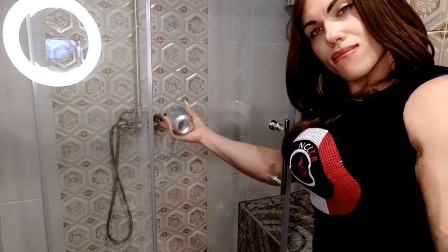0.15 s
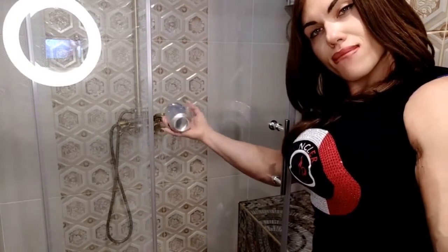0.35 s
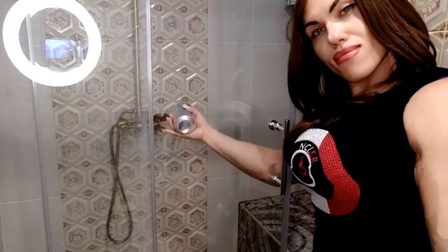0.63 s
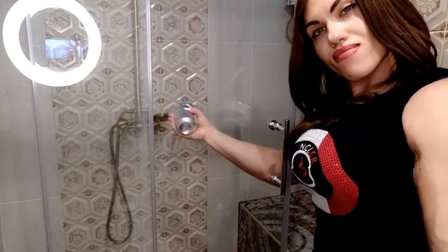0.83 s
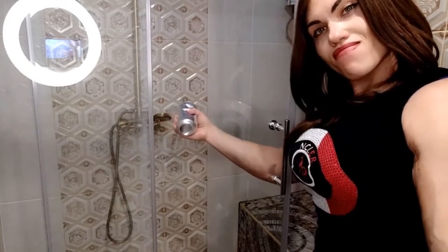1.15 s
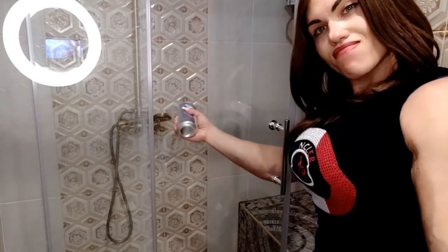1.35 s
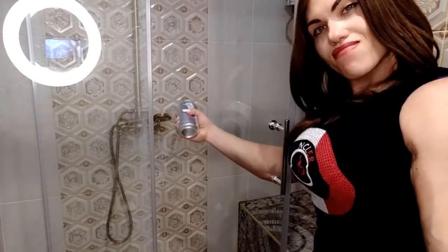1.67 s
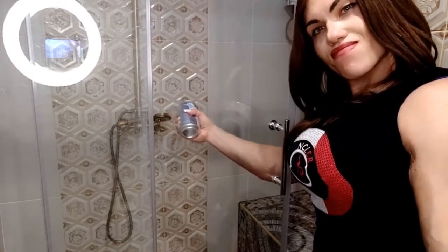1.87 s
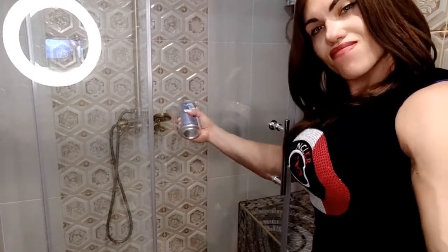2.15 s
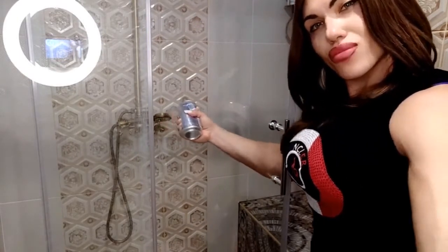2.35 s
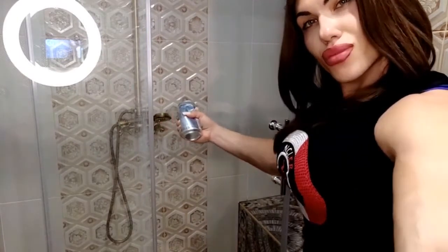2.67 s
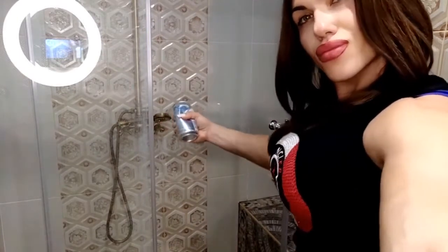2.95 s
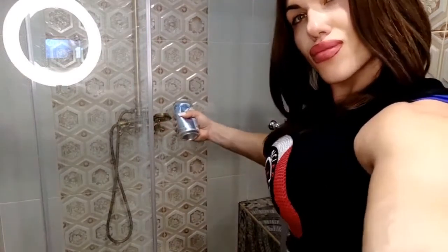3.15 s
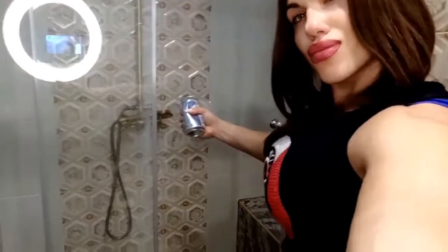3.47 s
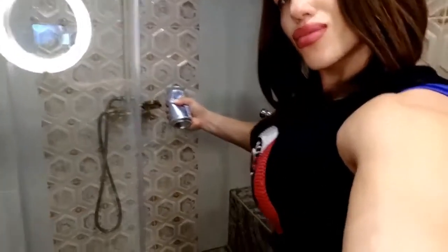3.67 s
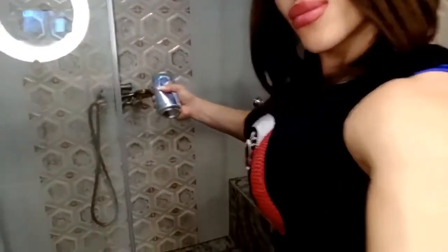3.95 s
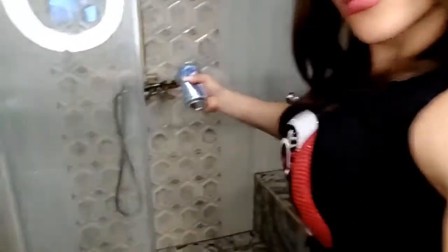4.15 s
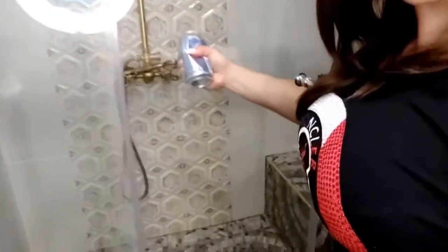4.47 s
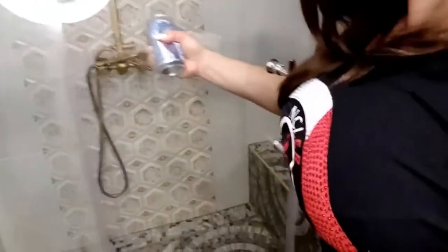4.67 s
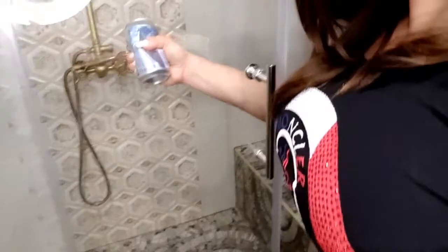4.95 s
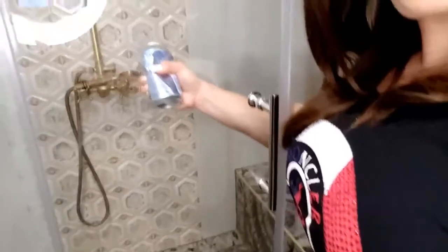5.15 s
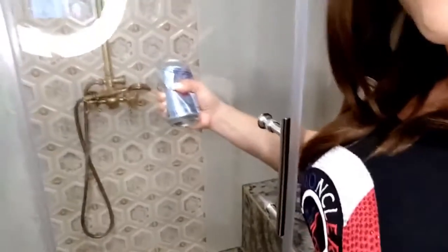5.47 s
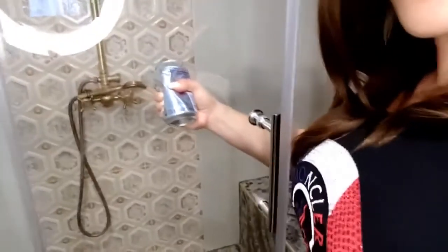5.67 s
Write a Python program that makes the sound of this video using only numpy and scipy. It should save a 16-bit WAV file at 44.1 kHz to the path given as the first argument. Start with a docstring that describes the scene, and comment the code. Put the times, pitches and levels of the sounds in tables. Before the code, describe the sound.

A thin metal can crunches in sharp bright bursts in a tiled bathroom, followed by quiet rubbing and later dull handling thuds close to the microphone.

```python
"""A tiled bathroom: a thin aluminium drink can is squeezed in one hand, its wall buckling in bursts of cracks.
Each buckle is a flurry of clicks ringing a panel; single creases crack more sharply among them.
The other hand slips on the phone, mostly later on: filtered click flurries thud in its case and scuff.
Fingers and clothes rub softly throughout, as grainy coloured noise, over rushing air and a ventilation hum.
Cracks, scuffs and finger hiss are brightest near 9 kHz, where the microphone port resonates."""
import sys
import numpy as np
from scipy import signal
from scipy.fft import rfft, irfft
from scipy.io import wavfile

SR = 44100
rng = np.random.default_rng(int(sys.argv[2]) if len(sys.argv) > 2 else 0)


def dump_mix(stems):
    """Bounce the given channels to the path in sys.argv[1] as a 16-bit WAV at rate SR."""
    frames = np.atleast_2d(stems).T  # one column per channel
    limited = np.clip(frames, -1, 1)  # hard clip at full scale
    pcm = np.round(limited * 32767).astype(np.int16)
    wavfile.write(sys.argv[1], SR, pcm)


N = 256662
TAPS = 8192   # filter length in samples
HZ = np.maximum(np.fft.rfftfreq(TAPS, 1 / SR), 1)
TIME = np.arange(N) / SR
RUN_UP_S = .02   # room ahead of each click flurry's peak
RUN_UP_PER_S = 12000   # fine clicks per second before the peak

# All event levels and spectra are relative.
# buckles of the can wall: t/s, snap level/dB, first fold level/dB, fold spacing/s, tilt/(dB per octave),
# low edge f/Hz, low panel note f/Hz, high panel note f/Hz
BUCKLES = [(.589, -11.5, -13, 0.015, -5, 500, 2370, 8500), (0.852, -21, -12.5, 0.015, -2, 500, 1000, 9250),
           (.911, 0, 2.5, 0.017, -0.9, 296, 790, 7140), (1.139, -3.5, -4.5, 0.0061, -3.5, 1200, 2500, 7350),
           (1.157, 12.5, 8.5, .019, 1.5, 1500, 2200, 9300), (1.194, 9.5, 5.5, .025, 0, 1400, 4250, 9200),
           (1.309, 17.5, 16.5, .014, 2.5, 220, 4800, 10040), (1.341, 12, 12, .025, 2.5, 220, 3300, 7400),
           (1.407, 0, -13, 0.012, 1.5, 1500, 2400, 9000), (1.521, 1.5, 2, 0.014, 8, 500, 3000, 8900)]
# colour of the cracking wall: f/Hz, level/dB
CAN_COLOUR = [(300, -25), (600, -22), (850, -16.5), (1300, -18), (2200, -12.5), (3500, -10.5),
              (4300, -13.5), (6500, -10), (8200, -6), (9100, -2), (10000, -10.5), (11000, -17),
              (14000, -23.5)]
# low, hollow notes of the yielding can: f/Hz, width/Hz, level/dB
HOLLOW_MODES = [(133, 14, -4), (172.4, 13, 7.5), (216.6, 1.9, 14.5), (309, 33, 2), (470, 113, 2)]
HOLLOW_DB = -35   # against the cracks
FOLD_LOSS_DB, FOLD_TILT_DB = 11, 0.8   # loss from fold to fold; tilt gained per fold, in dB per octave
FOLD_NOTE_RATIO = 0.99   # each fold rings lower than the last
SNAP_S, FOLD_SPREAD = 0.0026, 0.46   # length of the snap; share of its delay that a fold lasts longer
SNAP_HALF_DB = 3   # the sharp edge is half strength here, softer in weaker folds
PANEL_WIDTH_HZ, PANEL_DB = 150, -10   # the low note of a snapping panel

# single creases cracking out of the crumpling: t/s, level/dB, note f/Hz
CRACKS = [(.854, -16, 9500), (0.925, -6, 7500), (1.158, 6, 9000), (1.177, 7, 9200), (1.186, 4, 8000),
          (1.194, 4, 9000), (1.222, -7, 9000), (1.248, -5, 9100), (1.3, -10, 2600), (1.309, 0, 3350),
          (1.333, 8.5, 7800), (1.34, -5, 8400), (1.366, 11, 9200), (1.384, 1, 8800), (1.41, 0, 7540),
          (3.083, -10, 8800), (3.097, -15, 9000), (3.488, -15, 4300), (3.497, -6, 8800), (3.518, -10, 8600),
          (3.757, -15, 9150), (3.779, -5.5, 9000)]
CRACK_S, CRACK_WIDTH_HZ = 0.0014, 2000

# grip slips on the phone: t/s, thud level/dB, scuff level/dB, length/s, thud note f/Hz, scuff note f/Hz,
# scuff tilt/(dB per octave)
GRIP_SLIPS = [(0.52, -15, -17, 0.0096, 865, 4880, 1), (.535, -12, -24, 0.029, 345, 8850, -6),
              (.585, -13, -21, 0.031, 215, 8800, -3), (3.171, -9, -22, 0.0098, 653, 8850, 0),
              (3.335, -16.5, -29, 0.069, 370, 8600, -2), (3.453, -11.5, -26, 0.015, 268, 8850, 1),
              (3.472, -20, -1.5, 0.0091, 600, 8800, -2), (3.489, -9.5, 3.5, 0.01, 660, 8700, -2),
              (3.504, -9, -12, 0.0074, 302, 8700, -3), (3.571, -16.5, -5, 0.0052, 740, 7400, -4.5),
              (3.756, -25.5, -4, 0.0031, 590, 9100, 2), (3.783, -18, -5.5, 0.0091, 615, 9200, -1),
              (3.847, -22.5, -17, 0.01, 893, 9200, -5), (4.534, -13, -24, 0.087, 170, 8850, -6),
              (4.602, -12, -14, 0.0068, 600, 3500, -6), (4.61, 0, -6, 0.011, 670, 9350, -3.5),
              (4.632, -8.5, -18, 0.0063, 330, 3500, -6), (4.677, -2.5, -11, 0.016, 353, 4930, -7.5),
              (4.724, -5, -0.5, 0.0068, 560, 8840, -5.5), (4.736, -12.5, -5.5, 0.0091, 335, 4900, -4),
              (5.018, -8, -9.5, 0.017, 540, 8900, -6.5), (5.043, 6.5, 9.5, .0062, 494, 2930, -1),
              (5.06, 6, -3, 0.0079, 650, 4850, 0), (5.079, -4, 0.5, .005, 265, 2900, -1),
              (5.123, 5.5, 10.5, 0.0062, 506, 2814, -2.5), (5.132, 6.5, 13.5, 0.0085, 325, 8730, -1.5),
              (5.144, 3.5, 6, 0.006, 300, 2820, 3), (5.164, 4, 2.5, 0.0042, 1055, 2090, -1.5),
              (5.19, 1.5, -2, 0.012, 630, 2040, 4), (5.241, -5, -7.5, 0.012, 340, 2100, -4.5),
              (5.447, -17, -22.5, 0.1, 165, 8800, -19)]
# resonances of the phone's case: f/Hz, width/Hz, level/dB
CASE_MODES = [(77, 24, -19.5), (133, 43, -5), (211, 32, -2), (267.5, 13.3, 4.5), (323, 22, 3), (385, 20, 2),
              (510.6, 26.6, 4.5), (582, 29, 2), (649, 39, 2.5), (756, 38, -1.5), (830, 60, -7),
              (945, 15, -5.5), (1028, 19, -6), (1130, 23, -5), (1310, 160, -15), (2110, 110, -20),
              (2910, 160, -21), (3960, 400, -32), (5010, 90, -15)]
# dip between the case's low and middle resonances, where it hardly moves
CASE_GAP_HZ, CASE_GAP_WIDTH_HZ, CASE_GAP_DB = 435, 45, -14
# low sway of the whole phone: f/Hz, width/Hz, level/dB
SWAY_MODES = [(68, 31, 1.5), (98.4, 35, 14)]
SWAY_DB, SWAY_FOLLOWS = -24.5, 0.35   # base level; share of a thud's dB that it follows
FINGERTIP_HZ = 1690   # the briefest taps are cushioned from about here up, longer slips only from higher up
# colour of the scuffs: f/Hz, level/dB
SCUFF_COLOUR = [(880, -31), (1500, -13), (2090, -12.5), (2500, -11.5), (2940, -9), (3390, -10.5),
                (4870, -1.5), (5880, -1.5), (8680, 13.5), (11000, 5), (13400, -3), (14500, -11)]
# upper resonances that a scuff picks out: f/Hz, width/Hz, level/dB
SCUFF_MODES = [(2100, 87, 14), (2930, 135, 7.5), (3250, 110, 4), (3870, 130, 4), (4870, 67, -3.5),
               (5480, 56, -27)]
SCUFF_RING_DB, SCUFF_RING_FOLLOWS = -5, 1   # base level of those resonances; share of the thud's dB added
SCUFF_NOTE_DB, SCUFF_NOTE_SHARE = -3, 0.022   # each scuff's own note: height; width as a share of pitch
DRAG_AFTER, DRAG_LONGER = 3.1, 1.96   # delay and length of the drag, in slip lengths
DRAG_THUD_DB, DRAG_SCUFF_DB = -16.5, -35   # against the slip
HAND_PAN_DB = -2.4   # left minus right, for thuds and knocks at the hand on the phone

# hollow fingertip knocks on the phone: t/s, level/dB, note f/Hz, width/Hz, lingering ring level/dB
KNOCKS = [(3.632, -4.5, 527, 60.4, 4), (4.201, -11.5, 604, 113, -7), (4.631, -11, 690, 110, -12),
          (4.722, -9, 644, 100, -7), (5.079, -8, 560, 100, -12), (5.166, -1, 686, 110, -12)]
# further modes of a knock: ratio to its note, width/Hz, level/dB
KNOCK_MODES = [(.7, 22, -2), (2.05, 260, -17)]
KNOCK_RING_WIDTH_HZ = 6

# resonances of one tick close to the microphone: f/Hz, width/Hz, level/dB
TICK_MODES = [(750, 130, -6), (1500, 2400, -12), (2320, 420, -0.5), (3800, 650, -4), (5500, 1600, -10),
              (8700, 1200, -2.5)]
TICK_S, TICK_DB = 3.055, -6

# finger strokes: t/s, swell/s, hold/s, hiss level/dB, rustle level/dB, hiss pitch f/Hz
STROKES = [(-.06, 0.05, 0.026, -41.5, -46, 8900), (0.354, 0.2, 0.081, -48.5, -75, 8800),
           (0.806, 0.065, .03, -53, -54.5, 9300), (1.659, 0.033, 0.0089, -41, -47, 9550),
           (1.866, 0.064, 0.029, -41, -55, 9100), (2.109, 0.03, .028, -38, -55, 8630),
           (2.154, .1, .011, -26.5, -48, 8930), (2.443, 0.068, 0.049, -29.5, -58, 8900),
           (2.727, 0.021, 0.027, -46, -44.5, 8800), (2.796, 0.051, 0.055, -34, -51.5, 8740),
           (2.866, 0.037, 0.021, -39.5, -49.5, 7800), (3.041, 0.022, 0.096, -38, -52.5, 8770),
           (3.556, 0.011, 0.037, -40.5, -48.5, 6850), (3.714, 0.026, 0.037, -54, -49.5, 8800),
           (3.845, 0.037, 0.023, -43.5, -57, 8650), (4.808, 0.019, 0.024, -30, -53, 8570),
           (5.425, 0.036, 0.014, -39.5, -43, 8500)]
RELEASE_DB_PER_S = 166
# steady rubbing under the strokes: t/s, hiss level/dB, rustle level/dB
RUB = [(0, -57.5, -65), (.8, -55.5, -64.5), (1.6, -45.5, -51), (2.1, -50.5, -53.5), (2.702, -41.5, -48),
       (3.0, -47.5, -51), (3.3, -46, -50), (4.02, -49.5, -54.5), (4.3, -43.5, -54.5), (4.55, -47.5, -55.5),
       (5.3, -46.5, -49), (5.82, -44.5, -50.5)]
# colour of the finger hiss: f/Hz, level/dB
HISS_COLOUR = [(3000, -53), (4700, -26.5), (5800, -21.5), (7000, -8.5), (8200, -3), (8950, 2.5), (9400, -2),
               (10000, -5), (11300, -18.5), (14000, -25)]
HISS_PEAK_HZ = 8950
# colour of the cloth: f/Hz, level/dB
RUSTLE_COLOUR = [(500, -17.5), (1000, -12.5), (1500, -10.5), (2000, -5), (2900, -1.5), (4900, -2.5),
                 (7000, -1.5), (9000, -14.5), (11000, -3), (14000, -12)]

# colour of the rushing air: f/Hz, level/dB
AIR_COLOUR = [(12, -70), (20, 12), (30, -4.5), (48, -17), (76, -6.5), (117, -5.5), (151, -7), (185, -11.5),
              (270, -10.5), (394, -14), (1500, -27.5), (1950, -38), (3300, -120)]
AIR_DB = -59.5
HUM_HZ, HUM_WIDTH_HZ, HUM_DB = 153.5, 5.1, -63

# reverberation of the tiles, shortened for some sources: f/Hz, T60/s
TILES_T60 = [(150, 0.56), (600, 0.47), (2500, 0.48), (6000, 0.33), (9000, 0.28), (14000, 0.21)]
# left-right likeness, limited to -0.8 to 0.9 in use: f/Hz, correlation
LIKENESS = [(30, 0.56), (70, -0.15), (130, 1), (600, 0.56), (1400, -0.23), (3000, -0.088), (6500, 0.31),
            (13000, 1)]
# balance of the two microphones: f/Hz, left minus right level/dB
BALANCE_DB = [(30, -3), (100, -6), (300, -6.5), (700, -3), (2500, -2.8), (8000, -3.1), (13000, -1)]
CUTOFF_HZ, CEILING = 14300, .95   # top cut; full-scale ceiling for rounded peaks


def can():
    """Each fold of the wall is a click flurry ringing a dented panel, at notes and ripples of its own."""
    out, hollow = np.zeros((2, N)), impulse(resonances(HOLLOW_MODES))
    for s, db, length, tilt_db, edge_hz, low_hz, high_hz in folds():
        panel = 0.5 + resonances([(low_hz, PANEL_WIDTH_HZ, PANEL_DB), (high_hz, 900, -7)])
        panel /= np.sqrt(1 + (edge_hz / HZ) ** 4)   # a small panel radiates little bass
        colour = from_db(at_hz(CAN_COLOUR) + tilt_db * np.log2(HZ / 6000))
        wall = colour * panel * ripple(depth_db=3.0, step_hz=172.4)
        edge = 1 / (1 + from_db(SNAP_HALF_DB - db))
        snap = edge * (.45 + 0.79 / (1 + (length / 0.0069) ** 2))
        cracks = flurry(length, per_s=420, spread_db=3.8, lead=snap, rise_s=.004 + .004 * (1 - edge))
        ring = unit_energy(through(cracks, impulse(wall)))
        ring += from_db(HOLLOW_DB) * unit_energy(through(cracks, hollow))
        # every fold faces another way and meets the walls differently
        heard = bathroom(from_db(db) * np.pad(ring, (0, SR // 4)), wet_db=5.0, build_s=0.0015)
        for track, sound in zip(out, heard):
            add(track, s - RUN_UP_S, sound)
    return out


def folds():
    """Each buckle is a snap and two folds, the later ones longer, brighter and slightly lower in note."""
    for s, snap_db, fold_db, gap, tilt_db, edge_hz, low_hz, high_hz in BUCKLES:
        for k in range(3):
            db = fold_db - FOLD_LOSS_DB * (k - 1) if k else snap_db
            length = SNAP_S + FOLD_SPREAD * k * gap
            sag = FOLD_NOTE_RATIO ** k
            yield s + k * gap, db, length, tilt_db + FOLD_TILT_DB * k, edge_hz, low_hz * sag, high_hz * sag


def sharp_cracks():
    """A crease gives way within milliseconds: dense clicks ring one broad note, with modest reflections."""
    out = np.zeros(N)
    for s, db, note_hz in CRACKS:
        wall = from_db(at_hz(CAN_COLOUR)) * (0.16 + resonances([(note_hz, CRACK_WIDTH_HZ, 0)]))
        clicks = flurry(CRACK_S, per_s=5200, spread_db=2.5, lead=0.082, rise_s=.0008)
        add(out, s - RUN_UP_S, from_db(db) * unit_energy(through(clicks, impulse(wall))))
    return bathroom(out, wet_db=-5.0, build_s=.002)


def grip():
    """Skin sticks and slips on the phone: each slip thuds in the case and scuffs at the microphone."""
    taps, thuds, scuffs = np.zeros((3, N))
    sway = impulse(resonances(SWAY_MODES))
    for s, thud_db, scuff_db, length, contact_hz, scuff_hz, tilt_db in slips_and_drags():
        start = s - RUN_UP_S
        modes = [(hz, width, db + 1.4 * rng.normal()) for hz, width, db in CASE_MODES]
        modes += [(contact_hz, 45, -3)]
        # the place of contact favours the modes around its own note
        case = (resonances(modes) + from_db(-25.5)) * (1 + 0.97 * resonances([(contact_hz, 220, 0)]))
        case *= from_db(CASE_GAP_DB * np.exp(-((HZ - CASE_GAP_HZ) / CASE_GAP_WIDTH_HZ) ** 2))
        # a harder press brings out the upper resonances; one note stands out in each scuff
        press = from_db(SCUFF_RING_DB + SCUFF_RING_FOLLOWS * thud_db)
        surface = from_db(at_hz(SCUFF_COLOUR) + tilt_db * np.log2(np.maximum(HZ, 1500) / 6000))
        surface *= 1 + press * resonances(SCUFF_MODES)
        surface *= 0.5 + resonances([(scuff_hz, SCUFF_NOTE_SHARE * scuff_hz, SCUFF_NOTE_DB)])
        surface *= ripple(depth_db=3.0, step_hz=140.3)
        # the briefer the contact, the more it is one clean, cushioned tap
        brief = 1 / (1 + (length / 0.0043) ** 2)
        slips = flurry(length, per_s=900, spread_db=4.0, lead=0.19 + 0.85 * brief, rise_s=0.83 * length)
        grit = flurry(length, per_s=1000, spread_db=3.5, lead=2 * brief, rise_s=.5 * length)
        cushion = 1 / np.sqrt(1 + (brief * HZ / FINGERTIP_HZ) ** 4)
        thud = from_db(thud_db) * unit_energy(through(slips, impulse(case * cushion)))
        swaying = from_db(SWAY_DB + SWAY_FOLLOWS * thud_db) * unit_energy(through(slips, sway))
        add(taps, start, brief * thud + swaying)
        add(thuds, start, (1 - brief) * thud)
        add(scuffs, start, from_db(scuff_db) * unit_energy(through(grit, impulse(surface))))
    body = bathroom(taps, wet_db=-2.0, build_s=0.0023, t60_share=0.72)
    body += bathroom(thuds, wet_db=-5.5, build_s=0.0042, t60_share=0.88)
    scuffing = bathroom(scuffs, wet_db=3.5, build_s=0.00034)
    return panned(body, HAND_PAN_DB) + panned(scuffing, pan_db=-2.0)


def slips_and_drags():
    """After each slip of the grip the skin drags on, softer and longer."""
    for s, thud_db, scuff_db, length, *colour in GRIP_SLIPS:
        yield s, thud_db, scuff_db, length, *colour
        later = s + DRAG_AFTER * length
        yield later, thud_db + DRAG_THUD_DB, scuff_db + DRAG_SCUFF_DB, DRAG_LONGER * length, *colour


def knocks():
    """One clean push on the case: a hollow note, quickly damped, leaves a thin ring behind."""
    out = np.zeros(N)
    for s, db, note_hz, width_hz, ring_db in KNOCKS:
        modes = [(note_hz, width_hz, 0), (note_hz, KNOCK_RING_WIDTH_HZ, ring_db)]
        modes += [(ratio * note_hz, width, level_db) for ratio, width, level_db in KNOCK_MODES]
        add(out, s, from_db(db) * unit_energy(impulse(resonances(modes))))
    return panned(bathroom(out, wet_db=-3.5, build_s=0.0023, t60_share=.6), HAND_PAN_DB)


def tick():
    """A short, fairly dry click: a dense flurry rings a few broad resonances."""
    out = np.zeros(N)
    clicks = flurry(length=.0045, per_s=5000, spread_db=2.0, lead=.35, rise_s=.0012)
    sound = unit_energy(through(clicks, impulse(resonances(TICK_MODES))))
    add(out, TICK_S - RUN_UP_S, from_db(TICK_DB) * sound)
    return panned(bathroom(out, wet_db=-7.0, build_s=0.0015, t60_share=.5), pan_db=-3.0)


def rubbing():
    """Fingers slide over the metal with a fine hiss, pitched anew by each stroke; cloth rustles broadly."""
    times, *levels = np.transpose(RUB)
    slide, cloth = from_db([np.interp(TIME, times, db) for db in levels])
    steady_colour = from_db(at_hz(HISS_COLOUR)) * ripple(depth_db=3.0, step_hz=59.9)
    hiss = slide * noise(steady_colour, grain_db=-0.5)
    for start, swell, hold, hiss_db, rustle_db, hiss_hz in STROKES:
        speed = stroke(start, swell, hold)
        cloth = np.hypot(cloth, from_db(rustle_db) * speed)
        span = np.flatnonzero(TIME >= start)[:SR * 2 // 3]
        shifted = at_hz(HISS_COLOUR, HZ * HISS_PEAK_HZ / hiss_hz)
        colour = from_db(shifted) * ripple(depth_db=2.0, step_hz=60.0)
        hiss[:, span] += from_db(hiss_db) * speed[span] * noise(colour, grain_db=0.0, size=len(span))
    cloth_colour = from_db(at_hz(RUSTLE_COLOUR)) * ripple(depth_db=3.5, step_hz=60.1)
    rustle = cloth * noise(cloth_colour, grain_db=0.5)
    return panned(hiss, pan_db=-3.5) + panned(rustle, pan_db=0.5)


def stroke(start, swell, hold):
    """A finger gathers speed, holds it briefly, and its sound dies away."""
    t = TIME - start
    gather = np.sin(np.pi / 2 * np.clip(t / swell, 0, 1)) ** 2
    return gather * from_db(-RELEASE_DB_PER_S * np.maximum(t - swell - hold, 0))


def ventilation():
    """A low rush of air, and a hum that wavers because it is narrow-band noise."""
    rush = from_db(AIR_DB) * noise(from_db(at_hz(AIR_COLOUR)), grain_db=-1.5)
    hum = from_db(HUM_DB) * noise(resonances([(HUM_HZ, HUM_WIDTH_HZ, 0)]), grain_db=0.5)
    return rush + hum


def bathroom(x, wet_db, build_s, t60_share=1):
    """Direct sound plus the dense reflections of close tiled walls, dying band by band."""
    size = SR * 3 // 5
    hz, t, field = signal.stft(rng.standard_normal((2, size)), SR, nperseg=256)
    t60 = np.maximum(t60_share * at_hz(TILES_T60, hz + 1), .05)
    decay = from_db(-60 * t / t60[:, None])
    tails = signal.istft(field * decay, SR)[1][:, :size] * (1 - np.exp(-TIME[:size] / build_s))
    response = two_ears(unit_energy(tails[0]), unit_energy(tails[1]), treble_width_db=9.5)
    response *= from_db(wet_db)
    response[:, 0] += 1   # direct sound
    return np.array([through(x, r) for r in response]) / np.sqrt(1 + from_db(wet_db) ** 2)


def two_ears(mid, side, treble_width_db):
    """A diffuse field: how far the channels differ depends on frequency."""
    alike = np.clip(at_hz(LIKENESS), -.8, .9)
    treble = from_db(treble_width_db / (1 + (10000 / HZ) ** 12))
    width = np.sqrt((1 - alike) / (1 + alike)) * treble
    side = through(side, impulse(width))
    return np.array([mid + side, mid - side])


def flurry(length, per_s, spread_db, lead, rise_s):
    """Fine, dense clicks swell up to a leading snap, then random clicks die away; energy one."""
    t = TIME[:SR // 3] - RUN_UP_S
    swell = np.exp(np.minimum(t, 0) / rise_s - (np.maximum(t, 0) / (2 * length)) ** 2)
    rate = np.where(t < 0, RUN_UP_PER_S, per_s)
    sizes = from_db(spread_db * np.minimum(rng.exponential(1, len(t)), 3))
    sizes *= rng.choice([-1, 1], len(t))
    happens = rng.random(len(t)) < rate / SR
    clicks = unit_energy(sizes * happens * swell / np.sqrt(rate))
    clicks[round(RUN_UP_S * SR)] += lead
    return unit_energy(clicks)


def noise(gain, grain_db, size=N):
    """Stereo noise of a given colour, roughened by millisecond grains; mid rms one."""
    t = TIME[:size]
    knots = t[::64]
    grains = from_db(grain_db * np.interp(t, knots, rng.standard_normal(len(knots))))
    colour = impulse(gain)
    white = rng.standard_normal((2, size))
    mid, side = [unit_energy(through(w * grains, colour)) * np.sqrt(size) for w in white]
    return two_ears(mid, side, treble_width_db=-6.0)


def ripple(depth_db, step_hz):
    """Random peaks and notches: the many close modes of a surface in its present shape."""
    knots = np.arange(0, SR, step_hz)
    return from_db(depth_db * np.interp(HZ, knots, rng.standard_normal(len(knots))))


def resonances(modes):
    """Gain per frequency of a set of (Hz, width, dB) modes, with steep skirts."""
    power = [from_db(db) ** 2 / (1 + ((HZ - hz) / width) ** 2) ** 2 for hz, width, db in modes]
    return np.sqrt(sum(power))


def impulse(gain):
    """The causal, minimum-phase response that has this gain at each frequency."""
    cepstrum = irfft(np.log(gain + 1e-6))
    cepstrum[1:TAPS // 2] *= 2
    cepstrum[TAPS // 2 + 1:] = 0
    return irfft(np.exp(rfft(cepstrum)))


def through(x, response):
    """Filter a sound, keeping its length."""
    return signal.fftconvolve(x, response)[:len(x)]


def at_hz(points, hz=HZ):
    """Read a table along a log-frequency axis."""
    f, value = np.transpose(points)
    return np.interp(np.log(hz), np.log(f), value)


def from_db(db):
    """Decibels to gain."""
    return 10 ** (np.asarray(db) / 20)


def unit_energy(x):
    """Scale so that the squares sum to one."""
    return x / np.sqrt(np.sum(x ** 2) + 1e-20)


def panned(x, pan_db):
    """Set the left minus right level."""
    return x * from_db([[pan_db / 2], [-pan_db / 2]])


def add(track, s, sound):
    """Mix a sound in at a time."""
    start = round(s * SR)
    track[start:start + len(sound)] += sound[:N - start]


def scene():
    """All sources together, from the can to the ventilation."""
    squeeze = panned(can(), pan_db=-0.5) + sharp_cracks()
    phone = grip() + knocks() + tick()
    return squeeze + phone + rubbing() + panned(ventilation(), pan_db=3.0)


def record(dry):
    """The left microphone is the weaker one; the top is cut and peaks are rounded."""
    balance = at_hz(BALANCE_DB) / 2
    sides = [through(x, impulse(from_db(sign * balance))) for x, sign in zip(dry, (1, -1))]
    top_cut = signal.ellip(10, .2, 90, CUTOFF_HZ, fs=SR, output="sos")
    level = signal.sosfilt(top_cut, np.array(sides)) * from_db(-0.52)
    rounded = level / (1 + (level / CEILING) ** 4) ** .25
    # cut the top once more, to remove the high overtones that the rounding adds
    last_cut = signal.cheby2(14, 60, CUTOFF_HZ + 1000, fs=SR, output="sos")
    return signal.sosfilt(last_cut, rounded)


dry = scene()
out = record(dry)
dump_mix(out)
```